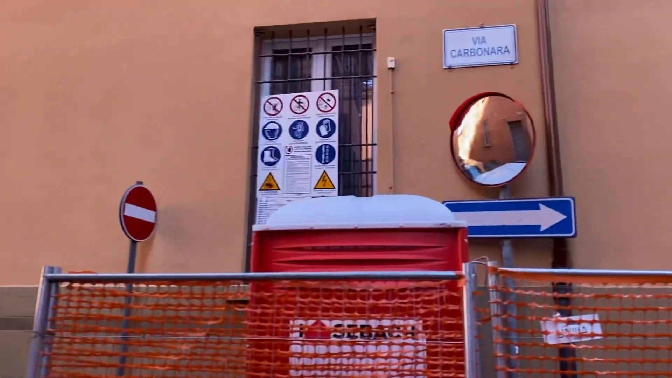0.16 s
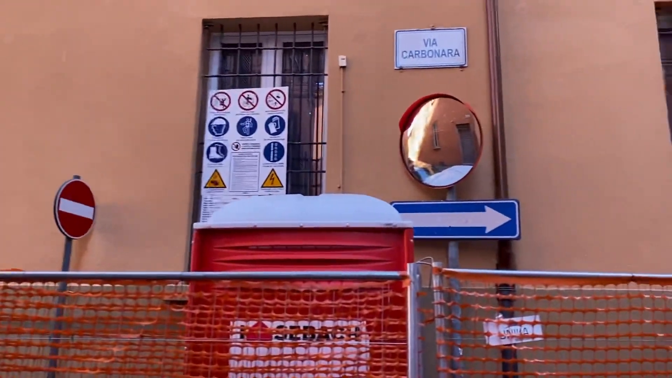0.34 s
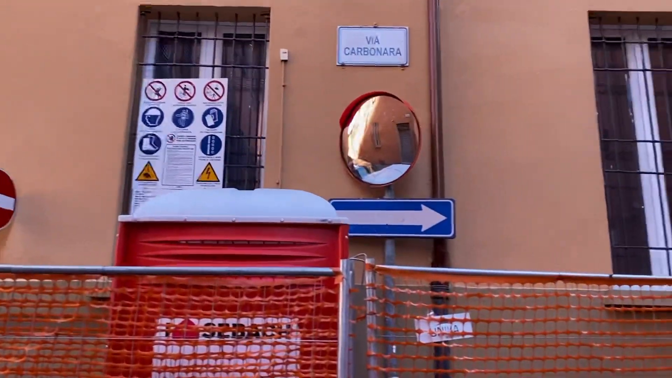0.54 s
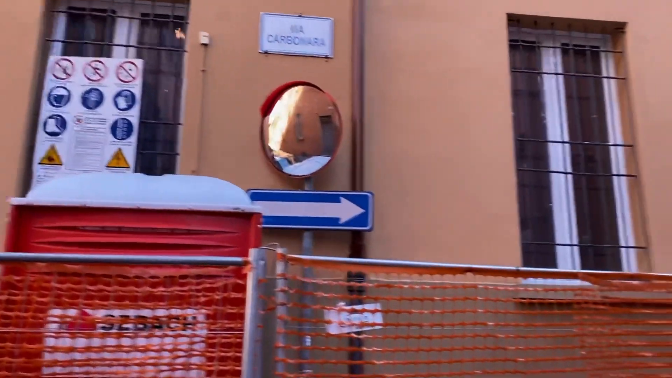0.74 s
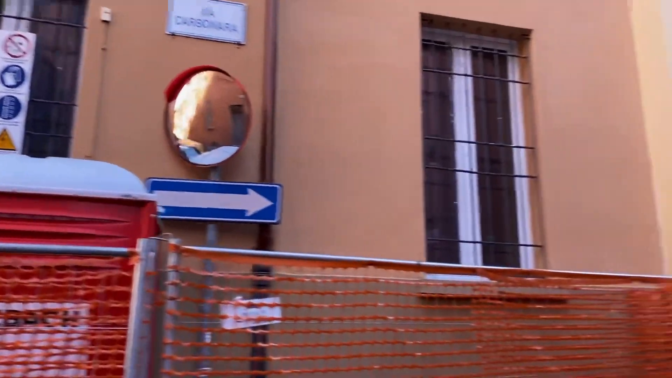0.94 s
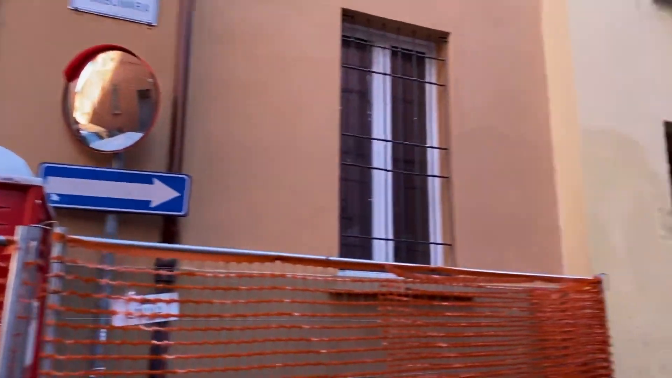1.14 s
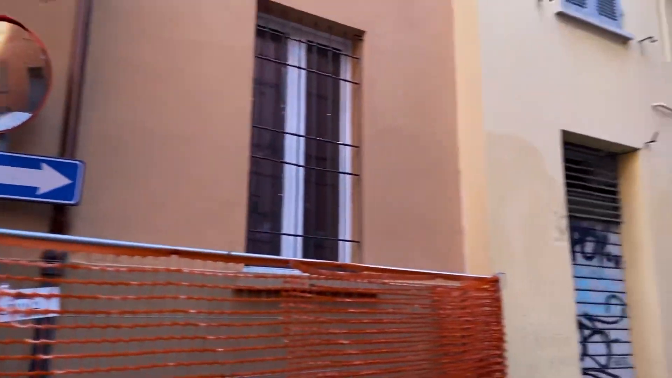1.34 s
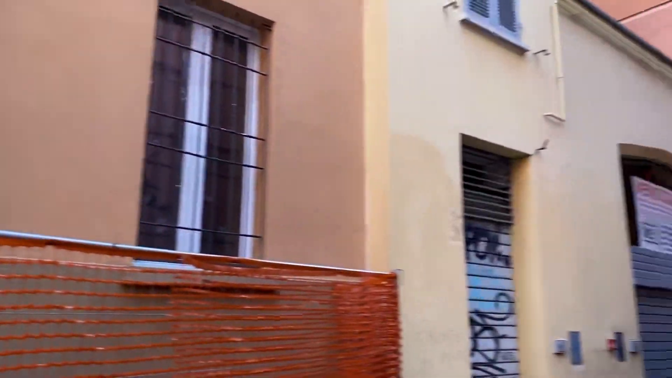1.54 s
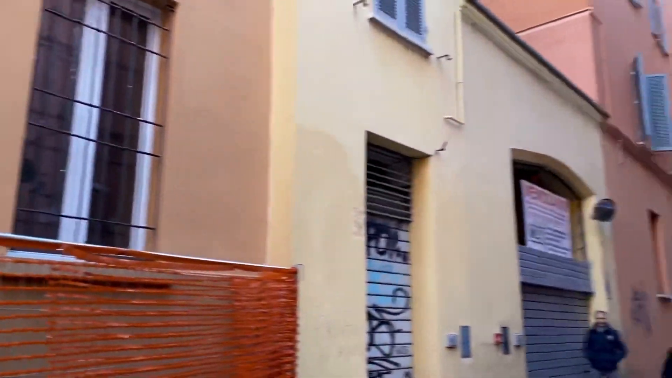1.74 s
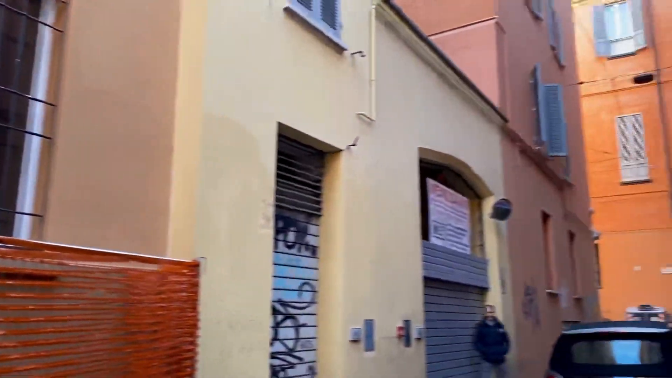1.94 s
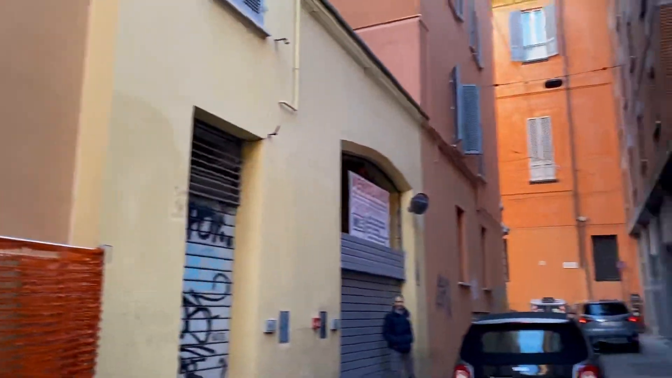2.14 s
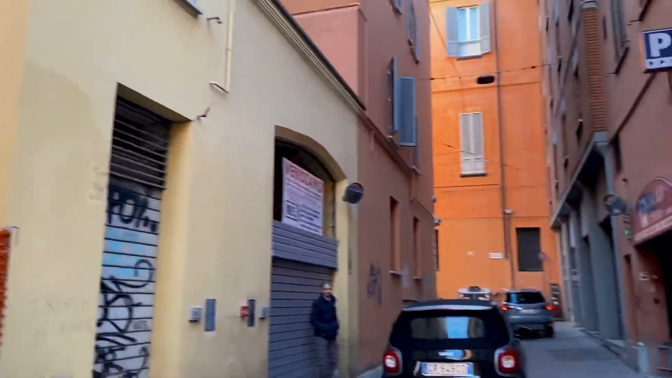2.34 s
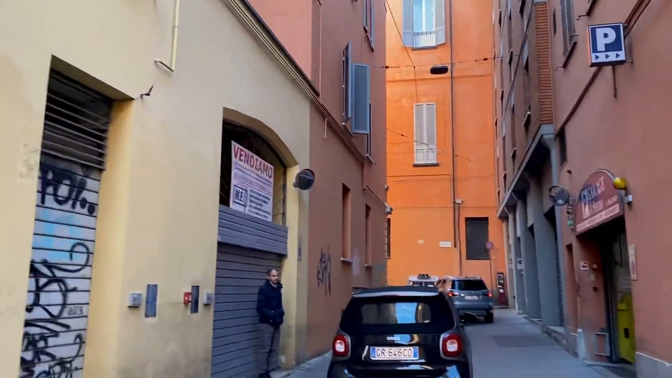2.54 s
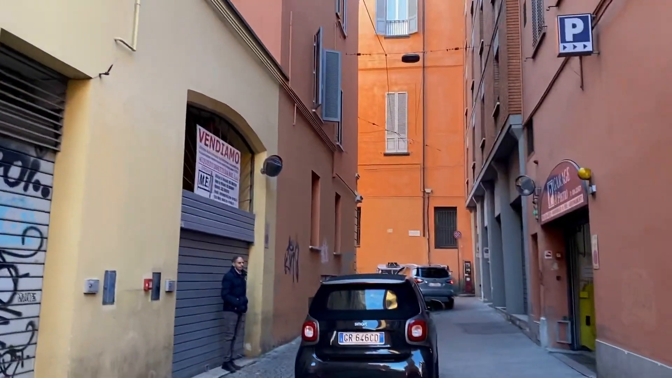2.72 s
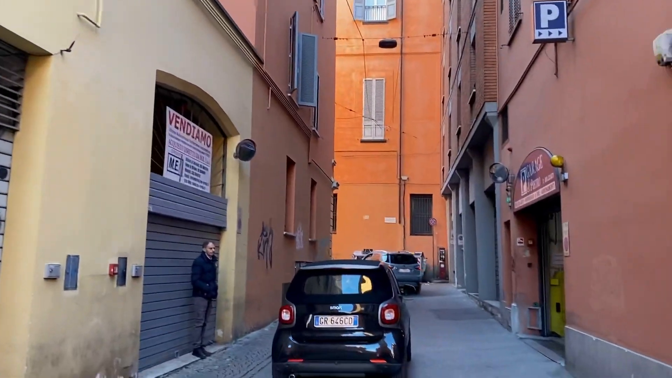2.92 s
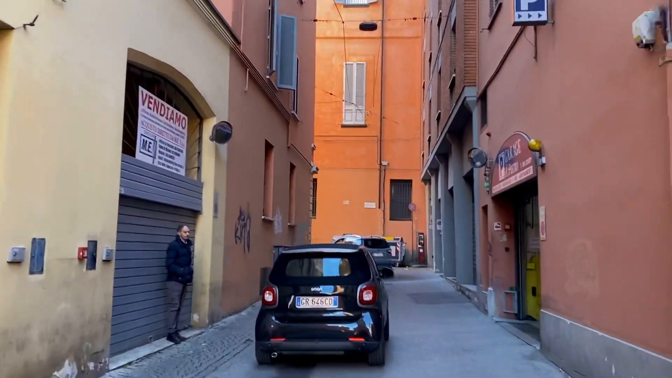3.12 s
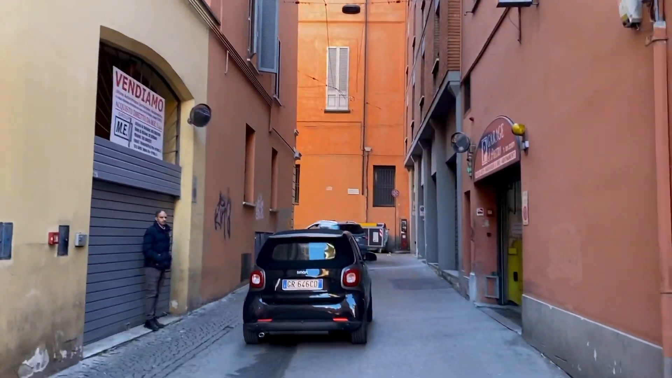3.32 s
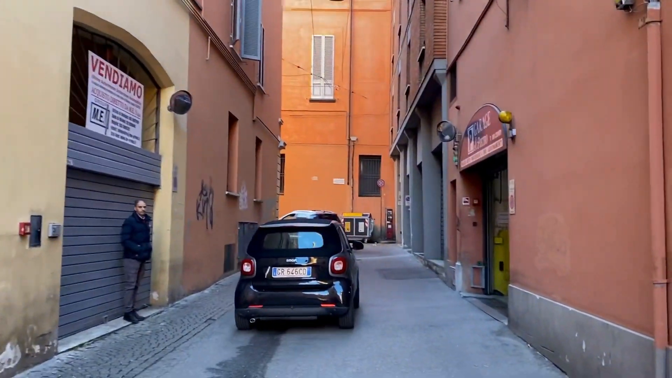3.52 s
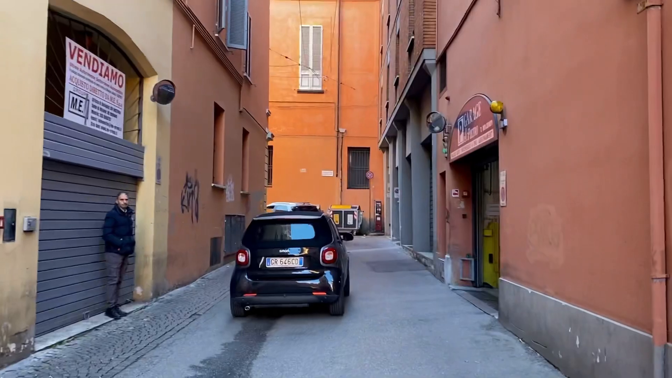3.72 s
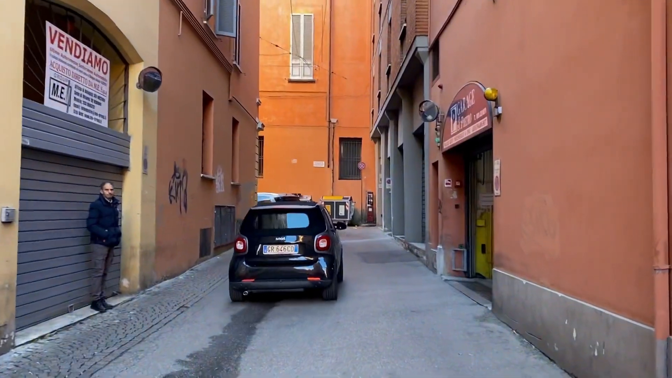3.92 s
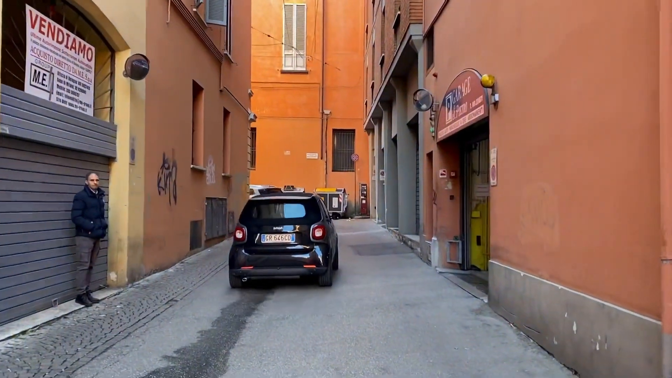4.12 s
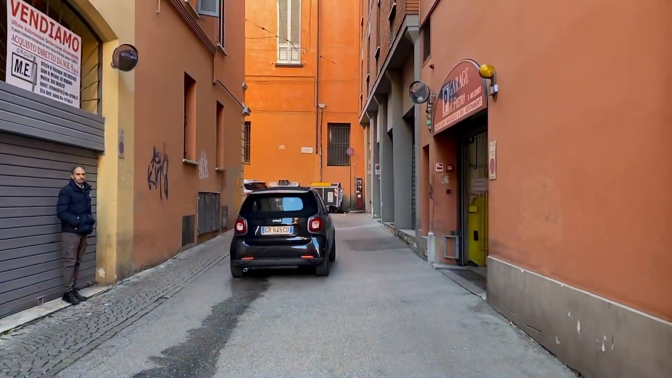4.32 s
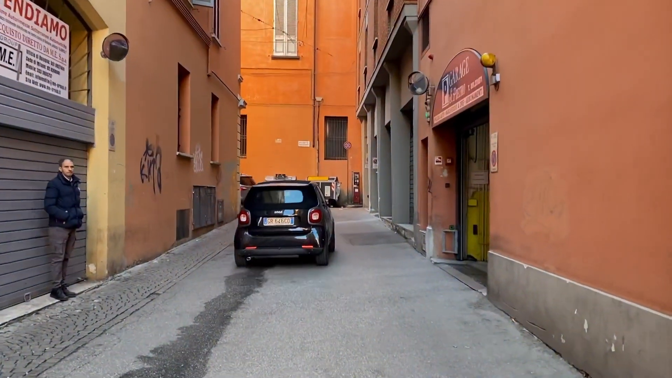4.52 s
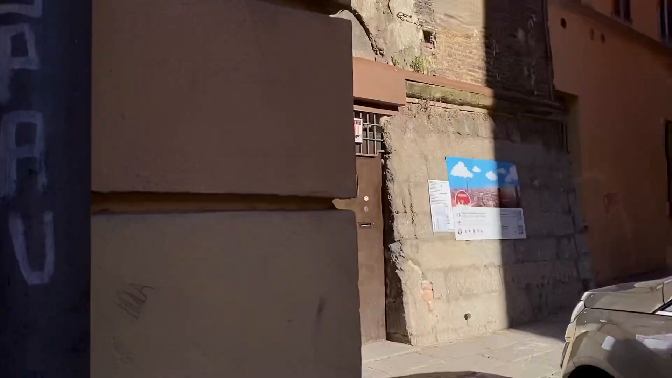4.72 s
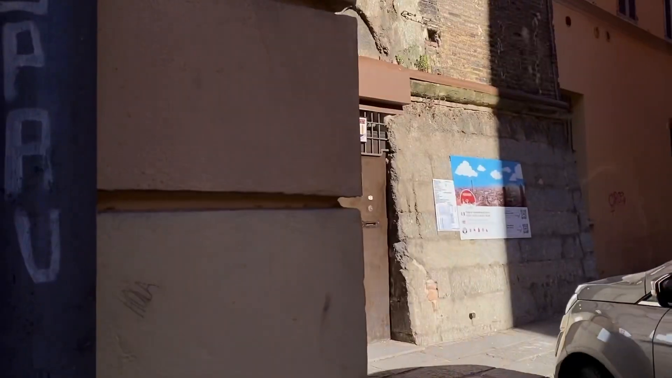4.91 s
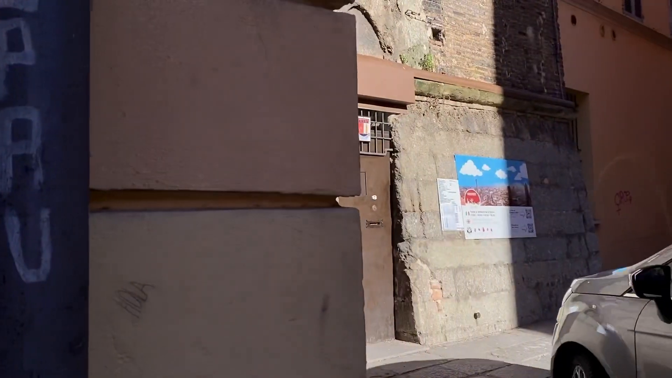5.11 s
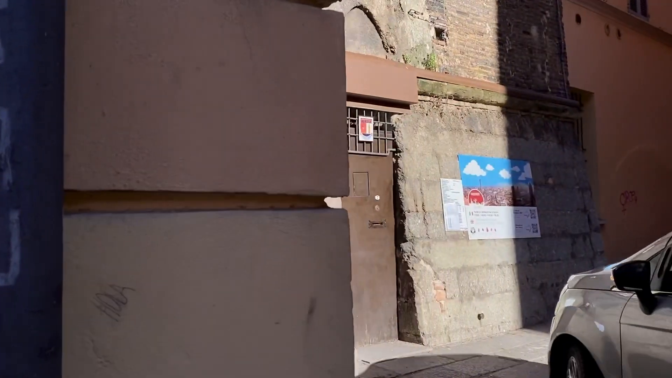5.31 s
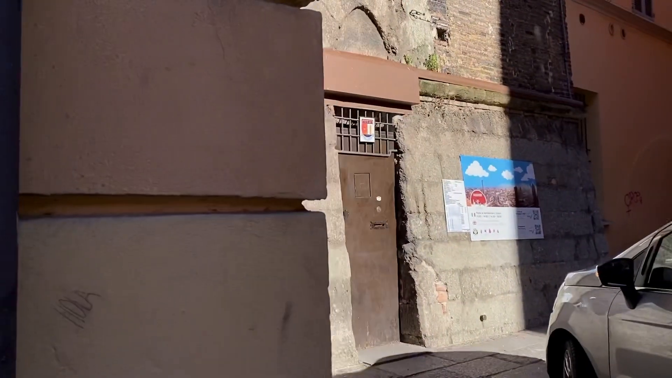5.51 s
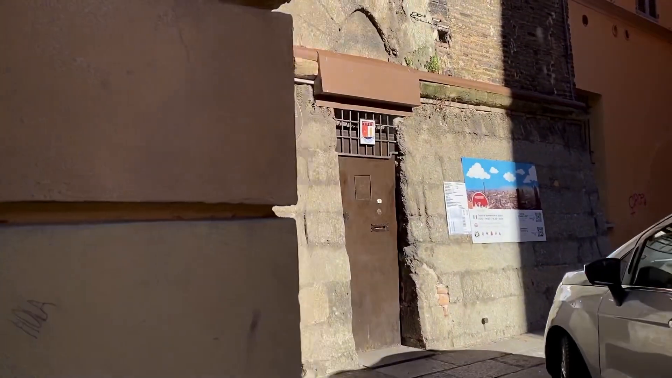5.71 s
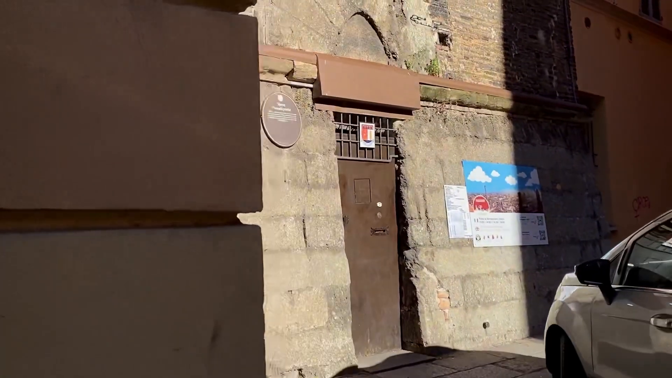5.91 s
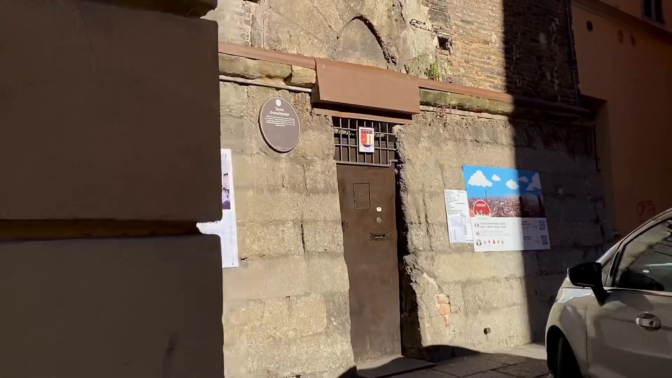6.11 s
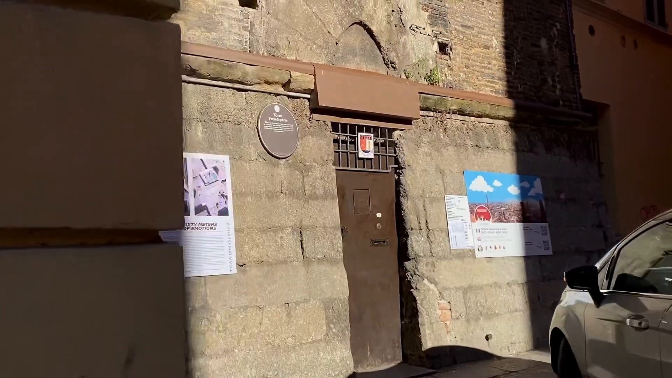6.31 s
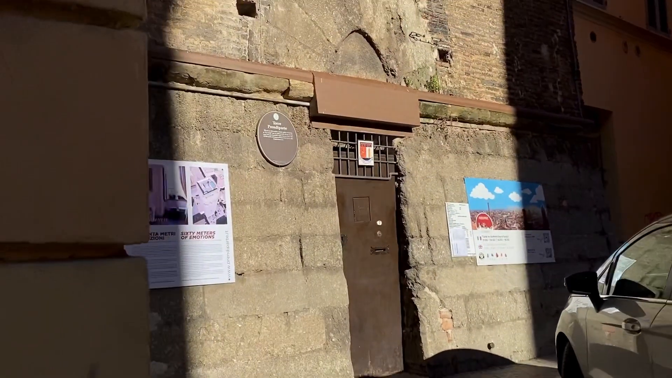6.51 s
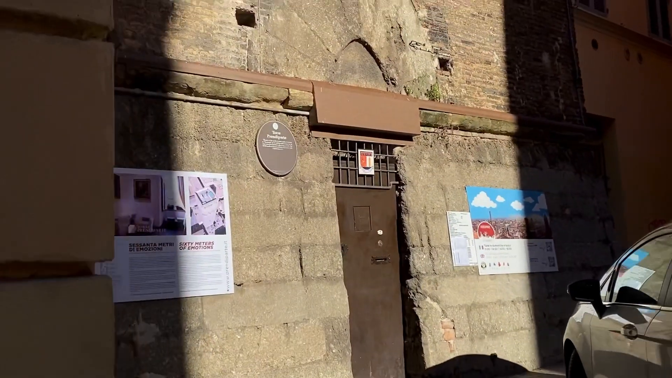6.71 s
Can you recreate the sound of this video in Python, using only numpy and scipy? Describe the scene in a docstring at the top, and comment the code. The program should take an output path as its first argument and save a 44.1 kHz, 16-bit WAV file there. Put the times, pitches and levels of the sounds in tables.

```python
"""Two cars in town

A small car pulls away down a narrow walled street while other engines idle nearby; its wheels knock loose covers.
The scene then changes to a corner where a second car rolls up close, clunks over a cover and slows down.
Engines are sums of sines on the crank cycle; rumble, drone, roar, hiss and fizz are bands of noise.
Covers are ringing modes struck by soft clicks; the whine, chirps and swells are noise through narrow
resonances, and thin sliding tones are sines."""
import sys
import numpy as np
from scipy import signal
from scipy.fft import rfft, irfft, next_fast_len
from scipy.io import wavfile

SR = 44100
rng = np.random.default_rng(int(sys.argv[2]) if len(sys.argv) > 2 else 0)


def transcribe(signal):
    """Save signal, clipped to [-1, 1], as a 16-bit WAV file at the path in sys.argv[1]."""
    frames = np.atleast_2d(signal).T
    limited = np.clip(frames, -1, 1)
    pcm = np.round(limited * 32767).astype(np.int16)
    wavfile.write(sys.argv[1], SR, pcm)


N = 297675

CHANGE_S, FADE_OUT_S, FADE_IN_S = 4.748, 0.0033, 0.011   # the sound dips to silence where the scene changes
T = np.arange(N) / SR
FIRST = T < CHANGE_S   # true in the street, false at the corner

# departing car: (time [s], crank cycle [Hz], 1st order [dB], 2nd order [dB], upper orders [dB])
DEPARTING_CAR = [(0.0, 22.94, -53, -37, -55), (0.22, 22.5, -54, -43.5, -53.5),
                 (0.57, 21.8, -48, -28.5, -55), (0.7, 21.83, -46, -42, -50), (0.82, 22.37, -47, -34, -51),
                 (0.95, 22.96, -50, -37, -58), (1.08, 23.6, -53, -31.5, -53), (1.261, 24.31, -57, -31, -55),
                 (1.52, 27.1, -59, -28.5, -45.5), (1.731, 31.4, -45, -26, -44),
                 (2.02, 34.91, -35, -24.5, -46), (2.38, 35.55, -35, -24.5, -44),
                 (3.03, 34.8, -32.5, -24.5, -48), (3.47, 36.2, -36, -20.5, -50.5),
                 (3.76, 37.06, -41, -29, -46.5), (4.16, 40.48, -26.5, -32.5, -45),
                 (4.361, 42.46, -35.5, -42, -50.5), (4.549, 43.47, -27.5, -50, -47),
                 (4.75, 41.67, -31.5, -50, -47)]
# its upper orders: (order [multiple of crank cycle], level added to the upper orders [dB])
DEPARTING_UPPER_ORDERS = [(3, -1), (4, 0), (5, -8.5), (6, -5), (7, -7), (8, -10), (9, -9), (10, -11),
                          (11, -7)]
# arriving car: (time [s], crank cycle [Hz], 1st order [dB], 2nd order [dB], upper orders [dB])
ARRIVING_CAR = [(4.75, 41.27, -37, -33, -61), (4.9, 39.82, -32.5, -25.5, -32.5),
                (5.081, 37.22, -44, -40.5, -43), (5.22, 34.32, -45, -27, -47), (5.37, 33.4, -52, -34, -35),
                (5.548, 30.1, -47, -30, -36), (5.75, 25.23, -53, -35, -34.5), (5.989, 21.9, -64, -42, -41),
                (6.28, 21.32, -63, -41, -39), (6.75, 21.54, -64, -50, -46)]
# its upper orders: (order [multiple of crank cycle], level added to the upper orders [dB])
ARRIVING_UPPER_ORDERS = [(3, -1.5), (4, 0), (5, -5), (6, -17), (7, -14)]
BOOM_HZ, BOOM_WIDTH_HZ = 98.5, 6.6   # an upper order changes level while it passes this pitch

# bright noise of the car in the street: (time [s], engine hiss [dB], treble fizz [dB])
STREET_BRIGHT = [(0.0, -57.5, -67), (0.85, -56.5, -65.5), (1.27, -56, -63), (1.97, -52, -57.5),
                 (2.44, -53, -58.5), (3.09, -53, -58), (4.03, -52.5, -58), (4.5, -53.5, -57.5),
                 (4.74, -54.5, -58)]
# bright noise of the car at the corner: (time [s], engine hiss [dB], treble fizz [dB])
CORNER_BRIGHT = [(4.76, -58, -57), (4.97, -71, -56), (5.32, -53.5, -55.5), (5.75, -57.5, -58),
                 (6.1, -60.5, -60.5), (6.55, -54.5, -63.5), (6.75, -58.5, -64.5)]
# rumble, drone and roar, one row each, follow crank speed and treble:
# (level at cruise [dB], rise with crank speed [dB per dB], rise with treble [dB per dB])
STREET_FOLLOW = [(-40.5, 1.7, -0.6), (-39.5, 1.5, 0.12), (-44, 0.6, 0.34)]
# the same at the corner: (level at cruise [dB], rise with speed [dB per dB], rise with treble [dB per dB])
CORNER_FOLLOW = [(-31.5, 0.24, 0.97), (-36, 1.22, 0.071), (-39, 0.65, 0.8)]
CRUISE_CYCLE_HZ, CRUISE_FIZZ_DB = 35, -57
RUMBLE_LUMPS_DB, LUMPS_PER_S = 1.2, 2.7   # uneven paving shakes the body
FLICKER_DB, FLICKERS_PER_S = 1.0, 10.0   # the treble flickers

# shape of the body rumble in the street: (frequency [Hz], relative density [dB per Hz])
STREET_RUMBLE_SHAPE = [(25, -23), (40, -10), (70, -1), (95, 1), (120, -2.5), (170, -7.5), (250, -12)]
# shape of the body rumble at the corner: (frequency [Hz], relative density [dB per Hz])
CORNER_RUMBLE_SHAPE = [(25, -23), (40, -8), (70, 2.5), (95, -1.5), (120, -2), (150, -5.5), (180, -13),
                       (220, -6.5), (260, -14)]
# shape of the drone in the street: (frequency [Hz], relative density [dB per Hz])
STREET_DRONE_SHAPE = [(130, -20), (200, -2.5), (300, 3), (450, 3), (600, 0), (900, -1.5), (1500, -10)]
# shape of the drone at the corner: (frequency [Hz], relative density [dB per Hz])
CORNER_DRONE_SHAPE = [(130, -30), (185, -21), (225, -1), (270, -2), (350, -3.5), (520, -3.5), (750, -5.5),
                      (1000, -8.5), (1500, -18)]
# shape of the tyre roar in the street: (frequency [Hz], relative density [dB per Hz])
STREET_ROAR_SHAPE = [(500, -39), (900, -4.5), (1300, 3.5), (1800, -1.5), (2350, -8), (3000, 0),
                     (3800, -22.5)]
# shape of the tyre roar at the corner: (frequency [Hz], relative density [dB per Hz])
CORNER_ROAR_SHAPE = [(500, -33), (900, -20), (1300, 3.5), (1800, -3), (2400, -5.5), (3000, -6.5),
                     (4000, -12), (6000, -18.5)]
# shape of the engine hiss: (frequency [Hz], relative density [dB per Hz])
HISS_SHAPE = [(2000, -15), (3500, -1), (4700, 0), (6000, -5), (7000, -8), (8000, -13), (10000, -24)]
# shape of the treble fizz: (frequency [Hz], relative density [dB per Hz])
FIZZ_SHAPE = [(6000, -12), (8000, -1), (12000, 0), (14000, -3), (17000, -6)]

# the near wheel tips a large cover, which lands and bounces:
# (time [s], peak before panning [dB], ring share [factor on ring time], left minus right [dB])
NEAR_CLUNKS = [(4.868, -12, .5, 0), (4.8719, -6.3, .8, -2), (4.8836, -12, .7, -3)]
# modes of the large cover: (frequency [Hz], relative level [dB], undamped time to fall 60 dB [s])
LARGE_COVER_MODES = [(156, -4.5, .17), (195, -5, .1), (255, -4, .06), (350, -5, .04), (452, -6, .07),
                     (520, 2.5, .115), (640, -8, .035), (760, -14, .025)]
# wheels on a small loose cover far down the street:
# (time [s], peak before panning [dB], ring share [factor on ring time], left minus right [dB])
FAR_KNOCKS = [(3.3295, -22.5, .5, -3), (4.0297, -17, .45, -.5), (4.704, -19.5, .8, -2)]
# modes of the small cover: (frequency [Hz], relative level [dB], undamped time to fall 60 dB [s])
SMALL_COVER_MODES = [(240, -3, .06), (340, 0, .07), (450, -3, .045), (600, -6, .03), (780, -8, .02),
                     (1100, -10, .015)]

# a low whine that comes with the departing car: (time [s], level [dB])
WHINE_LEVEL = [(0.0, -64), (1.15, -60), (1.55, -51.5), (1.8, -45.5), (2.4, -49), (2.7, -61), (3.5, -50),
               (3.9, -44), (4.4, -48.5), (4.48, -50), (4.74, -50)]
WHINE_HZ, WHINE_WIDTH_HZ = 440, 15
# a faint squeal chirps now and then: (time at the top [s], length [s], level [dB])
SQUEAL_CHIRPS = [(1.48, .08, -55), (1.63, .2, -53.5), (1.78, .14, -55), (1.905, .05, -47.5),
                 (1.945, .07, -48.5), (2.06, .26, -54.5), (3.56, .25, -55), (4.23, .12, -52)]
CHIRP_HZ, CHIRP_WIDTH_HZ = 2290, 45
# bands that swell and fade once: (time at the top [s], length [s], centre [Hz], width [Hz], level [dB])
BAND_SWELLS = [(0.094, 0.18, 1030, 37, -51), (0.75, 1.43, 1260, 37, -58.5), (0.8, 1.4, 1530, 58, -57),
               (0.35, .7, 4700, 360, -62), (1.104, 2.9, 4760, 620, -60.5), (1.599, 1.4, 1254, 170, -48.5),
               (1.8, 1.2, 3050, 350, -57.5), (3.0005, 1.07, 2340, 83, -60), (3.56, .5, 2090, 810, -52.5),
               (4.33, 0.6, 2350, 500, -52), (4.36, .6, 1600, 500, -52), (4.285, 0.04, 1600, 3400, -37),
               (4.222, .04, 1700, 2900, -40), (4.86, 0.24, 4600, 500, -50), (5.4, 0.85, 4760, 670, -57),
               (4.874, 0.27, 1370, 180, -42), (5.367, .014, 2300, 1200, -38),
               (4.43, 0.017, 1570, 1130, -40), (5.15, 0.76, 1340, 240, -45), (5.4, 1.1, 2380, 490, -50),
               (5.9, 0.84, 743, 270, -41.5), (5.85, 0.68, 380, 120, -44.5), (6.2, 1.06, 61.2, 9.8, -41.5),
               (6.3, 0.92, 94, 11.7, -49)]
# thin clean tones that slide: (start [s], end [s], start pitch [Hz], end pitch [Hz], level [dB])
SLIDING_TONES = [(0.62, 1.1, 2785, 2900, -64), (1.4, 1.8, 2790, 2780, -66), (1.051, 1.51, 240, 270, -45),
                 (1.03, 1.57, 340, 366, -50), (1.1, 1.65, 122, 127, -48), (2.7, 3.08, 78, 102, -35.5),
                 (4.42, 4.84, 440, 438, -43.5), (4.02, 4.45, 390, 420, -47.5)]
# steady hums of idling engines: (pitch [Hz], level at first [dB], midway [dB], at last [dB])
IDLING_HUMS = [(43.5, -48, -36, -44), (58.8, -48.5, -46, -55), (68.6, -54, -45, -70),
               (81.1, -63, -42.5, -51.5), (92.3, -45, -49, -63)]

# near walls and ground send the noise back: (lag [s], level [dB], wander of the lag [s])
WALL_ECHOES = [(.0039, -12, .0005), (.0071, -13, .0009), (.0128, -16, .0015)]
# street walls and ground lift and cut: (centre [Hz], width [Hz], change [dB])
STREET_TINT = [(2140, 120, -2), (2330, 210, 2), (2580, 140, 0), (3530, 430, -1), (4700, 350, 2.5),
               (5420, 260, -1), (5880, 250, 1), (6320, 350, 5), (7200, 740, 3)]
# the same at the corner: (centre [Hz], width [Hz], change [dB])
CORNER_TINT = [(410, 91, 1), (2450, 190, 2.5), (3050, 360, -1), (4640, 540, 2), (5300, 300, -1),
               (5800, 500, -1.5), (7530, 510, 2.5)]
# how alike the two sides are: (frequency [Hz], share common to both [0-1])
SIDE_LIKENESS = [(60, 0.9), (130, 0.85), (290, 0.88), (640, 0.25), (1400, 0.5), (2400, 0.55), (4500, 0.5),
                 (7000, 0.4), (9500, 0.88), (15000, 0.82)]
# how much later the right side gets the shared part: (frequency [Hz], lag [s])
RIGHT_LAG = [(100, .0001), (400, .0002), (780, .00015), (1460, .00034), (1900, .00045), (2400, .00044),
             (3000, .0004), (3300, 0), (8000, 0), (9500, -.00018), (12500, -.00018), (14000, -.00025),
             (16000, -.00025)]
# stereo lean of the noise: (frequency [Hz], left minus right [dB])
SIDE_BALANCE = [(60, 6), (110, -0.8), (200, -5), (380, 0.5), (700, 3), (1290, 0.4), (2380, 0.5),
                (4400, 2.5), (8120, -0.5), (15000, 1.5)]
CUTOFF_HZ = 15750


def from_db(db):
    """Gain of a level in dB."""
    return 10 ** (np.asarray(db) / 20)


def rms_one(x):
    """Scale to rms 1."""
    return x / np.sqrt(np.mean(x ** 2) + 1e-20)


def in_time(rows):
    """Draw each column as a curve over all samples."""
    s, *columns = np.transpose(rows)
    return np.array([np.interp(T, s, c) for c in columns])


def at_hz(points, hz):
    """Read a spectrum on a log frequency axis."""
    point_hz, values = np.array(points).T
    return np.interp(np.log(hz), np.log(point_hz), values)


def drift(rate):
    """Slow random wandering of spread 1; a higher rate in Hz wanders faster."""
    r = np.exp(-80 * np.pi * rate / SR)
    # one point every 40 samples; the first 4000 let the filter settle
    slow = signal.lfilter([1], [1, -2 * r, r * r], rng.standard_normal(N // 40 + 4002))[4000:]
    return np.interp(np.arange(N) / 40, np.arange(len(slow)), rms_one(slow))


def ring(x, hz, t60):
    """A resonance: a unit click sets off a sine that falls 60 dB in t60 seconds."""
    r, w = from_db(-60 / (t60 * SR)), 2 * np.pi * hz / SR
    return signal.lfilter([0, np.sin(w)], [1, -2 * r * np.cos(w), r * r], x + 1e-18)


def two_sides(common, own, hz):
    """Left and right share a part, shifted in time on the right, which also has a part of its own."""
    alike = np.clip(at_hz(SIDE_LIKENESS, hz), 0, 1)
    late = np.roll(common, round(at_hz(RIGHT_LAG, hz) * SR))
    right = alike * late + np.sqrt(1 - alike ** 2) * own
    lean = from_db(at_hz(SIDE_BALANCE, hz) / 2)
    return np.array([lean * common, right / lean])


def narrow_noise(hz, width_hz, count):
    """Noise passes twice through a resonance of this width, partly shared by the two sides."""
    t60 = 2.2 / width_hz
    once = ring(rng.standard_normal((2, count)), hz, t60)
    pair = rms_one(ring(once, hz, t60))
    return two_sides(*pair, hz)


def engine(curves, orders, waver_db, wobble, boom_db):
    """Sines on the crank cycle; each upper order wavers by itself in level and phase."""
    cycle_hz, first_db, second_db, upper_db = in_time(curves)
    turn = 2 * np.pi * np.cumsum(cycle_hz) / SR   # crank angle in radians
    out = from_db(first_db) * np.sin(turn + 1)
    out += from_db(second_db + 1.0 * drift(3.0)) * np.sin(2 * turn + 0.073 * drift(6.5))
    for order, level_db in orders:
        boom = boom_db * np.exp(-((order * cycle_hz - BOOM_HZ) / BOOM_WIDTH_HZ) ** 2)
        gain = from_db(upper_db + level_db + boom + waver_db * drift(3.6))
        out += gain * np.sin(order * turn + wobble * drift(2.9))
    return np.sqrt(2) * out, turn


def noise_levels(bright, follow, car):
    """Levels in dB of rumble, drone, roar, hiss and fizz; the first three follow speed and treble."""
    hiss_db, fizz_db = in_time(bright)
    speed_db = 20 * np.log10(in_time(car)[0] / CRUISE_CYCLE_HZ)
    treble_db = fizz_db - CRUISE_FIZZ_DB
    rolling = [db + fast * speed_db + near * treble_db for db, fast, near in follow]
    return np.array(rolling + [hiss_db, fizz_db])


def band_power(shapes, hz, widths):
    """Power per Hz of each source in each band, adding up to 1 for each source."""
    rows = []
    for shape in shapes:
        inside = (hz > shape[0][0] * .8) * (hz < shape[-1][0] * 1.2)
        rows.append(from_db(at_hz(shape, hz)) ** 2 * inside)
    power = np.array(rows)
    return power / (power * widths).sum(axis=1, keepdims=True)


def car_noise(turn):
    """Third-octave noise bands fed by five sources; hiss and fizz throb once a crank cycle."""
    street_db = noise_levels(STREET_BRIGHT, STREET_FOLLOW, DEPARTING_CAR)
    corner_db = noise_levels(CORNER_BRIGHT, CORNER_FOLLOW, ARRIVING_CAR)
    powers = from_db(np.where(FIRST, street_db, corner_db)) ** 2
    powers[0] *= from_db(RUMBLE_LUMPS_DB * drift(LUMPS_PER_S)) ** 2
    powers[2] *= from_db(np.where(FIRST, .7, 1.0) * drift(75)) ** 2   # coarse paving makes the roar grainy
    powers[4] *= from_db(FLICKER_DB * drift(FLICKERS_PER_S)) ** 2
    powers[3:] *= from_db(1.0 * np.sin(turn)) ** 2

    edges = 22 * 2 ** (np.arange(30) / 3)
    mid_hz, widths = np.sqrt(edges[1:] * edges[:-1]), np.diff(edges)
    street_shapes = (STREET_RUMBLE_SHAPE, STREET_DRONE_SHAPE, STREET_ROAR_SHAPE, HISS_SHAPE, FIZZ_SHAPE)
    corner_shapes = (CORNER_RUMBLE_SHAPE, CORNER_DRONE_SHAPE, CORNER_ROAR_SHAPE, HISS_SHAPE, FIZZ_SHAPE)
    street = band_power(street_shapes, mid_hz, widths)
    corner = band_power(corner_shapes, mid_hz, widths)

    cut = FIRST.sum()
    white = rng.standard_normal((2, 2, N))   # two stereo noises, used by bands in turn
    together_db = 0.11 * drift(2.1)   # all bands waver together a little
    out = 0
    for k, hz in enumerate(mid_hz):
        band = signal.butter(2, edges[k:k + 2], "band", fs=SR, output="sos")
        pair = signal.sosfilt(band, white[k % 2])
        power = np.r_[street[:, k] @ powers[:, :cut], corner[:, k] @ powers[:, cut:]]
        gain = np.sqrt(power * SR / 2) * from_db(together_db + 1.09 * drift(19.5))
        out = out + gain * two_sides(*pair, hz)
    return out


def knocks(blows, modes, sign, count):
    """Each blow is a soft click of count samples into the cover's modes; the tyre damps the ring by its share."""
    out, span = np.zeros((2, N)), int(.3 * SR)
    click = np.zeros(span)
    click[:count] = np.hanning(count)
    chance_db = rng.normal(0, 1.0, (len(blows), len(modes)))   # no two blows are quite alike
    for (s, peak_db, share, pan_db), own_db in zip(blows, chance_db):
        blow = np.zeros(span)
        for k, (hz, db, t60) in enumerate(modes):
            mode = ring(click, hz, t60 * np.clip(share, .1, 2))
            blow += from_db(db + own_db[k]) * mode * sign ** k   # a negative sign flips every other mode
        at = round(s * SR)
        side_db = peak_db + np.array([[pan_db], [-pan_db]]) / 2
        out[:, at:at + span] += from_db(side_db) * blow / np.abs(blow).max()
    return out


def whine():
    """Narrow noise whose level flutters, heard only in the street."""
    level_db = in_time(WHINE_LEVEL)[0] + 2.0 * drift(6.4)
    return from_db(level_db) * narrow_noise(WHINE_HZ, WHINE_WIDTH_HZ, count=N) * FIRST


def chirps_and_swells():
    """Bands of narrow noise that each rise and fall once."""
    chirps = [(s, length, CHIRP_HZ, CHIRP_WIDTH_HZ, db) for s, length, db in SQUEAL_CHIRPS]
    out = np.zeros((2, N))
    for s, length, hz, width_hz, level_db in BAND_SWELLS + chirps:
        span = round(length * SR)
        start = int(np.clip(round(s * SR) - span // 2, 0, N - span))
        swell = np.hanning(span) * narrow_noise(hz, width_hz, count=span)
        out[:, start:start + span] += from_db(level_db) * swell
    return out


def glides():
    """Each sine fades in, slides in pitch, wavers a little and fades out."""
    out = 0
    for start, end, start_hz, end_hz, level_db in SLIDING_TONES:
        way = np.clip((T - start) / (end - start), 0, 1)
        turn = 2 * np.pi * np.cumsum(start_hz + (end_hz - start_hz) * way) / SR
        fade = np.sqrt(2 * np.sin(np.pi * way))
        out = out + fade * from_db(level_db + 1.9 * drift(8.0)) * np.sin(turn + .3 * drift(10.0))
    return out


def idling():
    """Other engines as steady sines that waver a little in level and phase."""
    out = 0
    for hz, *level_db in IDLING_HUMS:
        gain = from_db(np.interp(T, [0, CHANGE_S * 0.56, CHANGE_S], level_db) + 2.5 * drift(4.8))
        out = out + np.sqrt(2) * gain * np.sin(2 * np.pi * hz * T + 1.7 * drift(0.67))
    return out


def walls(x):
    """Short echoes with creeping lags comb the noise; each place has its own colour."""
    at, out = np.arange(N), x.copy()
    for lag_s, level_db, wander_s in WALL_ECHOES:
        read = at - SR * (lag_s + wander_s * drift(.4))
        out += from_db(level_db) * x[:, np.abs(read).astype(int)]
    out /= np.sqrt(1 + sum(from_db(echo[1]) ** 2 for echo in WALL_ECHOES))   # keep the power level

    size = next_fast_len(N)
    hz, spectrum = np.fft.rfftfreq(size, 1 / SR), rfft(out, size)
    places = []
    for tint in (STREET_TINT, CORNER_TINT):
        tint_db = sum(db * np.exp(-((hz - f) / w * 2) ** 2) for f, w, db in tint)
        places.append(irfft(spectrum * from_db(tint_db), size)[:, :N])
    return np.where(FIRST, *places)


def scene():
    """First the street, then the corner, with a short dip to silence between."""
    leaving, leaving_turn = engine(DEPARTING_CAR, DEPARTING_UPPER_ORDERS, waver_db=2.5, wobble=0.6, boom_db=-1.0)
    coming, coming_turn = engine(ARRIVING_CAR, ARRIVING_UPPER_ORDERS, waver_db=3.2, wobble=1.2, boom_db=4.5)
    hum = np.where(FIRST, leaving + idling() + glides(), coming)
    noise = walls(car_noise(np.where(FIRST, leaving_turn, coming_turn)))
    squeaks = whine() + chirps_and_swells()
    far = knocks(FAR_KNOCKS, SMALL_COVER_MODES, -1.13, count=18)
    near = knocks(NEAR_CLUNKS, LARGE_COVER_MODES, 0.87, count=40)
    dip = np.clip(np.abs(T - CHANGE_S) / np.where(FIRST, FADE_OUT_S, FADE_IN_S), 0, 1)
    return (hum + noise + squeaks + far + near) * dip


def record(dry):
    """The deep bass rolls off and the top is cut."""
    bass_cut = signal.sosfilt(signal.butter(2, 25, "high", fs=SR, output="sos"), dry)
    return signal.sosfilt(signal.ellip(12, .5, 70, CUTOFF_HZ, fs=SR, output="sos"), bass_cut)


dry = scene()
out = record(dry)
transcribe(out)
```